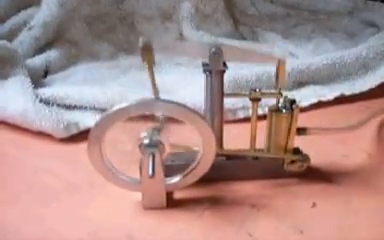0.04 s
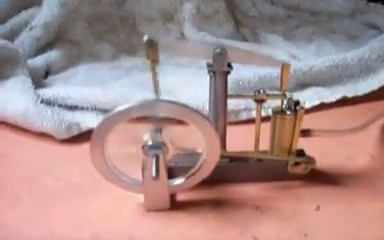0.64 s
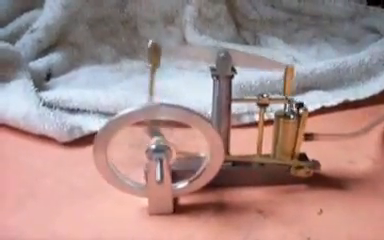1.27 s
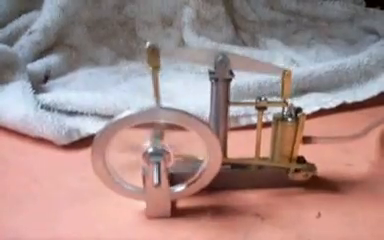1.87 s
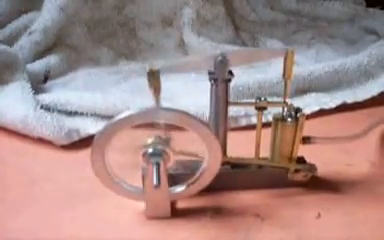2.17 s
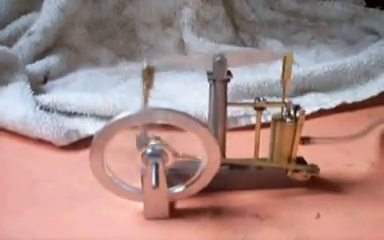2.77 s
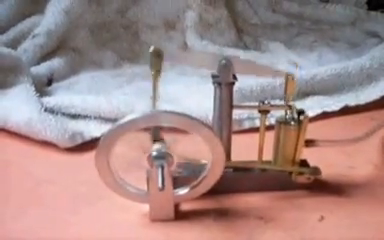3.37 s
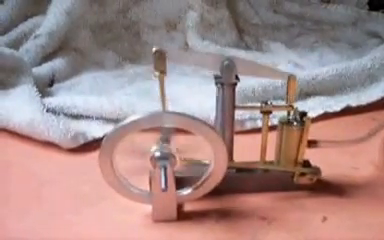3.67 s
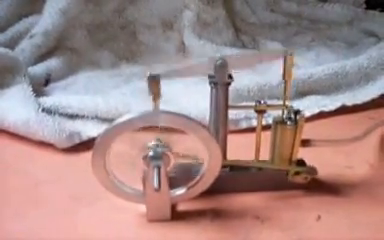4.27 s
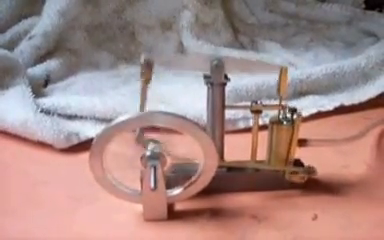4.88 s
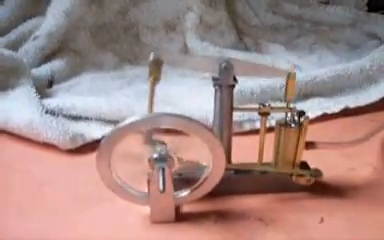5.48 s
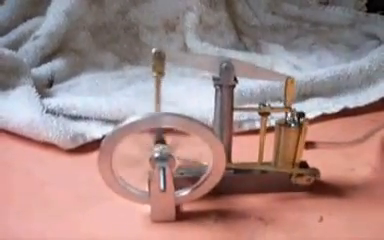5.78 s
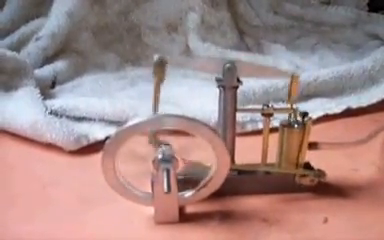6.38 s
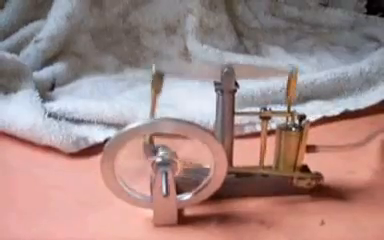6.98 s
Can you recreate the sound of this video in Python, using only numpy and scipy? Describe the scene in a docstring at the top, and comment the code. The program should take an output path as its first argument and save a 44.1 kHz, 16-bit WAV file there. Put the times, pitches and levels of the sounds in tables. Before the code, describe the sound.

Close up in a quiet room, a bright, fizzing steam hiss pulses from a tabletop model engine. Its sticking piston gives a short buzz on most turns of the flywheel and rasps faintly on the way back, with a slight resonance from the frame and table. Droplets spit and the valve sputters now and then. The engine runs throughout, its quick beat slowly easing.

```python
"""Indoors at a table, a mono microphone close to a model beam engine, a quiet room behind it.
The engine slows from four and a half turns a second to just over three. Wet steam hisses and
sputters from valve and cylinder in the same run of spurts every turn, with droplets spitting in it.
The piston sticks and slips: a brief buzz ends each working stroke, faint on a few turns,
and softer rasps follow on the way back. Frame and table resonate with steam and piston alike."""
import sys
import numpy as np
from scipy import signal
from scipy.fft import rfft, irfft
from scipy.io import wavfile

SR = 44100
rng = np.random.default_rng(int(sys.argv[2]) if len(sys.argv) > 2 else 0)


def transcribe(u):
    """Save the signal u as a 16-bit wav file named by the first command-line argument.

    u: samples, shape (n,) or (channels, n), limited to [-1, 1]; the rate is SR.
    q: integer samples, one column per channel.
    """
    v = np.clip(np.atleast_2d(u).T, -1, 1)
    q = np.round(v * 32767).astype(np.int16)
    wavfile.write(sys.argv[1], SR, q)


N = 319284
TIME = np.arange(N) / SR
HZ = np.maximum(np.fft.rfftfreq(2 * N, 1 / SR), 1)

# turns of the flywheel: end of working stroke t/s, then relative level/dB of
# the buzz, the return rasps, the steam on the working stroke, the steam on the return stroke
FLYWHEEL_TURNS = [(0.036, -50, -48.5, -3.5, 0.5), (0.26, -58, -51, -1, 0), (0.476, -39.5, -52, 1, 1.5),
                  (0.704, -39.5, -52, 1, 0.5), (0.938, -41.5, -54, 1, 0.5), (1.183, -44, -48.0, -1.5, 0),
                  (1.422, -43.5, -46, 0, -0.5), (1.655, -57, -47, -1.5, 0), (1.906, -55, -48, -2.5, 0.5),
                  (2.17, -39.5, -53, -1.0, -0.5), (2.434, -38.5, -49.5, -0.5, 1.5),
                  (2.692, -40, -51.5, 2, -0.5), (2.952, -40.0, -49, -0.5, -4.5),
                  (3.207, -40.5, -51, 0.5, 1.5), (3.463, -39, -50.5, 3, -0.5), (3.72, -40.5, -50.5, 2.5, 1),
                  (3.981, -42.0, -49.5, 0.0, -0.5), (4.242, -39, -48, -2.5, -1),
                  (4.506, -39, -48.5, 1.5, 0), (4.778, -42, -48, -3, -1.0),
                  (5.059, -40.0, -49.5, -0.5, -2.5), (5.344, -39, -48.5, 1, -1), (5.635, -59, -48, -1, 1.5),
                  (5.928, -40, -51, 3, 0.5), (6.218, -39.5, -50, 0.5, 1.5), (6.52, -39.5, -48.5, -1, 0.5),
                  (6.829, -39.5, -51, 0.5, 0), (7.13, -39.5, -51, 3, 1.5)]
STROKE_END_S, BUZZ_DB, RASP_DB, WORKING_STEAM_DB, RETURN_STEAM_DB = np.transpose(FLYWHEEL_TURNS)
# spurts of steam in every turn: start after the buzz/turns, length/turns, relative level/dB
STEAM_SPURTS = [(-.208, 0.19, 1), (-.075, 0.22, 1.5), (.18, .16, -0.2), (.305, .18, 3), (.42, 0.25, 0.6),
                (.6, .2, -2.5)]
# sputters as a slug of water clears the valve: t/s, peak level/dB over the steady leak
VALVE_SPUTTERS = [(0.558, 3), (1.38, 3), (3.15, 5.5), (3.584, 4.5), (3.942, 3), (4.45, 1), (5.288, 8),
                  (6.463, 4.5), (6.971, 4)]
# the sharpest spits of water: t/s, relative level/dB
WATER_SPITS = [(0.653, -9), (2.2566, -10), (2.4444, -10), (3.1592, -12), (5.885, -12), (6.4653, -12),
               (7.0754, -8), (7.142, -10)]
# rasps of every return stroke: middle after the buzz/turns, half length/turns, relative level/dB
RETURN_RASPS = [(.225, 0.025, -5), (.38, 0.043, -0.5), (.51, 0.037, 2), (.71, 0.025, -6.5)]
# spectra of the steam jet, the piston's chatter and the room tone: f/Hz, relative level/dB
JET_SPECTRUM = [(150, -27.5), (500, -24.5), (1000, -20.5), (1600, -9), (2200, -2.5), (2800, 0.2),
                (3250, 1.5), (3650, 0.63), (4000, -1.5), (5000, -19), (7000, -26)]
CHATTER_SPECTRUM = [(100, -20.5), (300, -14), (520, -5), (900, -0.5), (1200, 2.5), (1800, 7.5),
                    (2600, -11.5), (4000, -8), (8000, -17)]
ROOM_SPECTRUM = [(20, -4.5), (40, -16), (70, -9.5), (95, -0.5), (145, 7), (190, -2), (270, 7), (400, 0),
                 (900, -11), (4000, -8)]
# resonances of frame and table: f/Hz, width/Hz, lift/dB
FRAME_RESONANCES = [(139, 39, 4), (266, 72, 6.5), (487, 125, 4.5), (537, 26, 3), (792, 93, 4.5),
                    (896, 72, 3), (1155, 500, 3.5), (1660, 80, -0.5), (1780, 260, -0.5), (2650, 39, 3.5),
                    (3735, 160, 2)]


def from_db(db):
    """Decibels to gain."""
    return 10 ** (np.asarray(db) / 20)


def unit_rms(x):
    """Scale to unit power."""
    return x / np.sqrt(np.mean(x ** 2) + 1e-20)


def drift(rate):
    """Random wander with `rate` new values a second and a spread of 1."""
    knots = rng.standard_normal(N // 4)
    return np.interp(TIME * rate, np.arange(len(knots)), knots) * np.sqrt(3 / 2)


def colour(x, spectrum, resonances=()):
    """Minimum-phase filter of unit power gain, from a spectrum and its resonances."""
    hz, level = np.transpose(spectrum)
    db = np.interp(np.log(HZ), np.log(hz), level)
    for centre, width, lift in resonances:
        db = db + lift / (1 + (2 * (HZ - centre) / width) ** 2)
    cepstrum = irfft(np.log(unit_rms(from_db(db))))
    cepstrum[1:N] *= 2  # folded forward, so the ringing follows its cause
    cepstrum[N + 1:] = 0
    return irfft(rfft(x, 2 * N) * np.exp(rfft(cepstrum)))[:N]


def crank_times(angle, scatter=0):
    """When the crank passes an angle (in turns after the buzz), and how long each turn lasts, in s."""
    turn_s = np.gradient(STROKE_END_S)
    angles = angle + scatter * rng.standard_normal(len(turn_s))
    return STROKE_END_S + turn_s * angles, turn_s


def spurt(start, length, peak_db):
    """Power of one spurt of steam: it opens fast and fades."""
    power = np.zeros(N)
    span = slice(max(int(start * SR), 0), max(int((start + length) * SR), 0))
    age = np.clip((TIME[span] - start) / length, 0, 1)
    power[span] = from_db(peak_db) ** 2 * 27 / 4 * age * (1 - age) ** 2
    return power


def steam_flow(sputter_s=0.024, spurt_db=-0.5, uneven_db=0.54, flutter_db=0.85):
    """Jet strength: a steady leak of 1, a few sputters and spurts timed by the crank, all fluttering."""
    power = 1 + sum(spurt(at, sputter_s, db) for at, db in VALVE_SPUTTERS)
    for angle, turns, db in STEAM_SPURTS:
        starts, turn_s = crank_times(angle, scatter=.005)
        stroke_db = WORKING_STEAM_DB if angle < 0 else RETURN_STEAM_DB
        peaks_db = db + spurt_db + stroke_db + uneven_db * rng.standard_normal(len(starts))
        for start, length, peak_db in zip(starts, turns * turn_s, peaks_db):
            power += spurt(start, length, peak_db)
    return np.sqrt(power) * from_db(flutter_db * drift(rate=70))


def steam_jet(flow, leak_db=-39.5, drops_per_s=2000, drop_spread_db=2, fizz_db=-2, spit_db=-1.5):
    """Close up, turbulent hiss, the fizz of bursting droplets and sharp spits share the jet's colour."""
    sizes = from_db(drop_spread_db * np.minimum(rng.exponential(1, N), 4))
    signs = rng.choice([-1, 1], N)
    bursts = rng.random(N) < drops_per_s * unit_rms(flow) / SR  # more steam: more drops, not bigger
    fizz = from_db(fizz_db) * unit_rms(sizes * signs * bursts)
    hiss = flow * rng.standard_normal(N)
    jet = from_db(leak_db) * np.std(hiss) * unit_rms(unit_rms(hiss) + fizz)
    for at, db in WATER_SPITS:
        jet[int(at * SR)] += from_db(db + spit_db)
    return colour(jet, JET_SPECTRUM, FRAME_RESONANCES)


def room_tone(level_db=-63):
    """Faint, low, steady noise of the room behind the engine."""
    return from_db(level_db) * colour(rng.standard_normal(N), ROOM_SPECTRUM)


def gurgle(flow, level_db=-54.5):
    """Flow above the steady leak stirs the water in the cylinder and adds body to the hiss."""
    surge = np.sqrt(np.maximum(flow ** 2 - 1, 0))
    return from_db(level_db) * unit_rms(surge) * rng.standard_normal(N)


def swells(times, half_lengths, levels_db):
    """Envelope of flat-topped swells centred on the given times."""
    envelope = np.zeros(N)
    for at, half, db in zip(times, half_lengths, levels_db):
        span = slice(max(int((at - 2 * half) * SR), 0), max(int((at + 2 * half) * SR), 0))
        envelope[span] += from_db(db) * np.exp(-.5 * ((TIME[span] - at) / half) ** 4)
    return envelope


def stick_slip(pitch_hz, jitter, uneven_db, grit, wander=.03):
    """One click per slip at a wandering pitch, uneven in time and size, with friction noise."""
    hz = pitch_hz * (1 + wander * drift(rate=4) + jitter * drift(rate=200))
    slip_count = np.floor(np.cumsum(hz) / SR)
    clicks = np.diff(slip_count, prepend=0) * from_db(uneven_db * drift(rate=300))
    return unit_rms(unit_rms(clicks) + grit * rng.standard_normal(N))


def working_stroke(slip_hz=296.5, buzz_half_turns=0.041, lead_turns=0.095,
                   scrape_half_turns=0.076, scrape_db=-9.5):
    """The piston first scrapes, then breaks into a short, regular, thin buzz."""
    ends, turn_s = crank_times(0)
    buzz = swells(ends, buzz_half_turns * turn_s, BUZZ_DB)
    scrape = swells(ends - lead_turns * turn_s, scrape_half_turns * turn_s, BUZZ_DB + scrape_db)
    regular = stick_slip(slip_hz, jitter=.02, uneven_db=2.1, grit=0.48)
    rough = stick_slip(slip_hz, jitter=.15, uneven_db=-1.0, grit=0.62)
    low_cut = signal.butter(1, 350, "high", fs=SR, output="sos")
    return buzz * signal.sosfilt(low_cut, regular) + scrape * rough


def return_stroke(flow, slip_hz=266, gain_db=1, vary_db=1.7):
    """The piston rasps back at about the same crank angles every turn, swelling with the steam."""
    envelope = np.zeros(N)
    for angle, half_turns, db in RETURN_RASPS:
        times, turn_s = crank_times(angle, scatter=0.0064)
        levels_db = db + RASP_DB + vary_db * rng.standard_normal(len(times))
        envelope += swells(times, half_turns * turn_s, levels_db)
    rasp = stick_slip(slip_hz, jitter=.09, uneven_db=2.5, grit=0.38)
    return from_db(gain_db) * envelope * np.sqrt(unit_rms(flow)) * rasp


def scene():
    """At the microphone: steam and piston close, the room behind, the same in both channels."""
    flow = steam_flow()
    chatter = working_stroke() + return_stroke(flow) + gurgle(flow)
    cylinder = colour(chatter, CHATTER_SPECTRUM, FRAME_RESONANCES)
    return np.tile(room_tone() + steam_jet(flow) + cylinder, (2, 1))


def record(dry):
    """A small camera samples slowly and holds each value: the steps mirror the hiss into the treble."""
    sampler_hz, cutoff_hz = 8002, 13700
    anti_alias = signal.butter(10, sampler_hz / 2, fs=SR, output="sos")
    narrow = signal.sosfilt(anti_alias, dry)
    last_sample_s = np.floor(TIME * sampler_hz) / sampler_hz
    held = np.array([np.interp(last_sample_s, TIME, channel) for channel in narrow])
    high_cut = signal.ellip(10, .3, 75, cutoff_hz, fs=SR, output="sos")
    return signal.sosfilt(high_cut, held)


dry = scene()
out = record(dry)
transcribe(out)
```